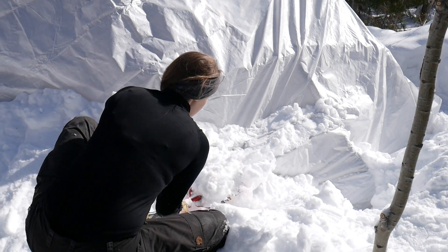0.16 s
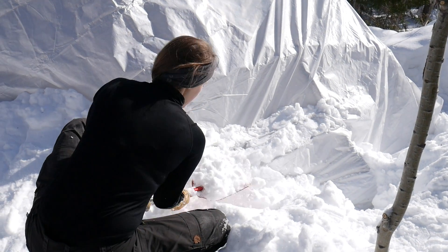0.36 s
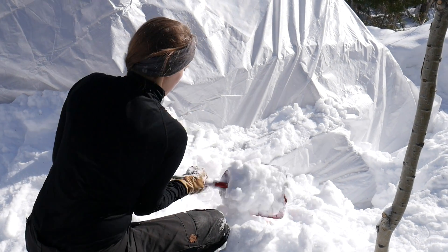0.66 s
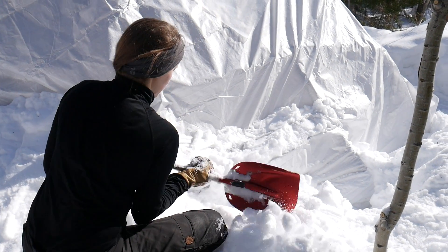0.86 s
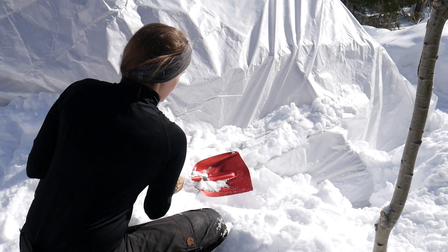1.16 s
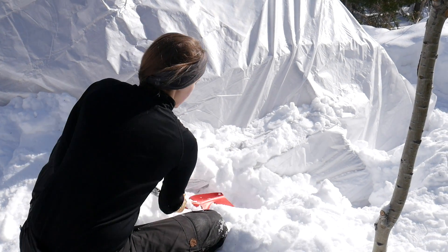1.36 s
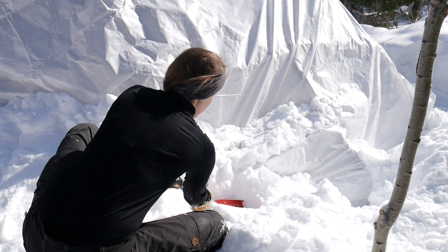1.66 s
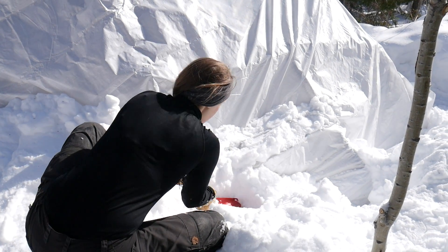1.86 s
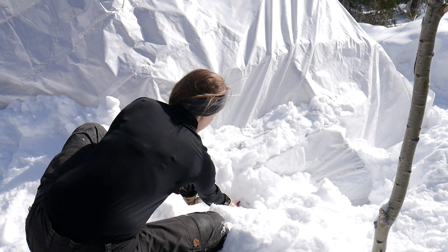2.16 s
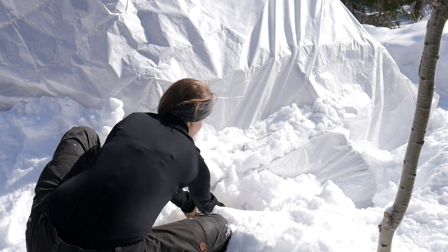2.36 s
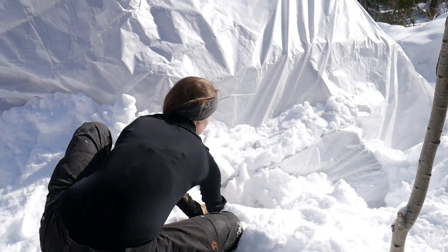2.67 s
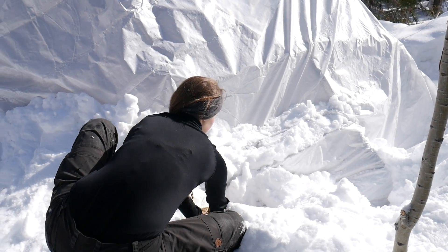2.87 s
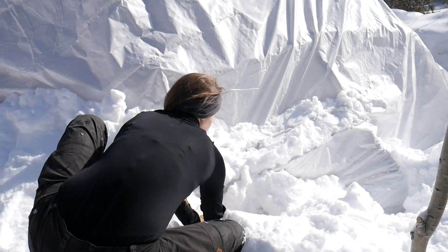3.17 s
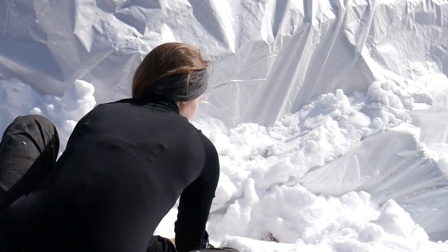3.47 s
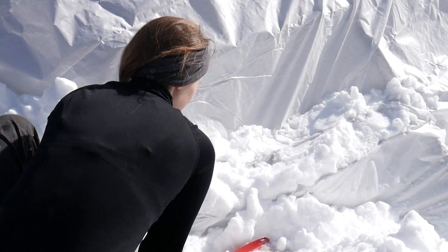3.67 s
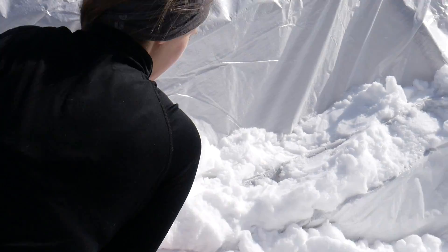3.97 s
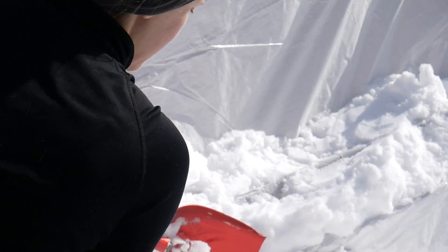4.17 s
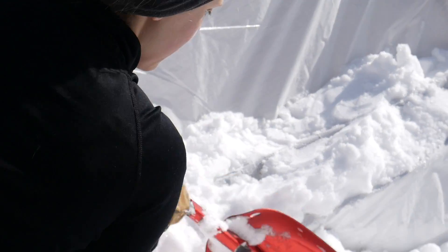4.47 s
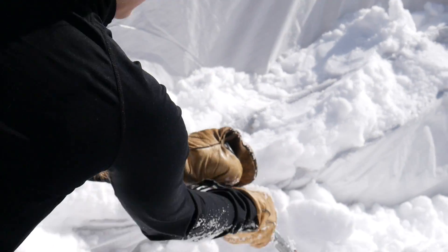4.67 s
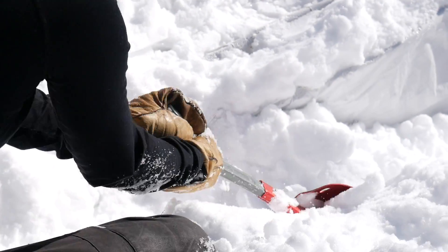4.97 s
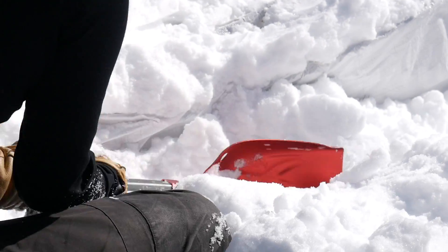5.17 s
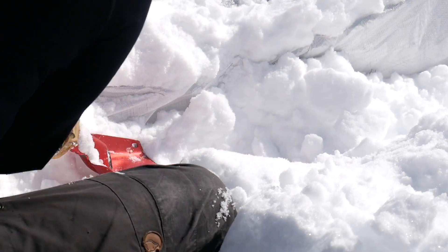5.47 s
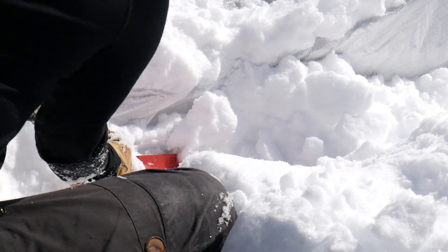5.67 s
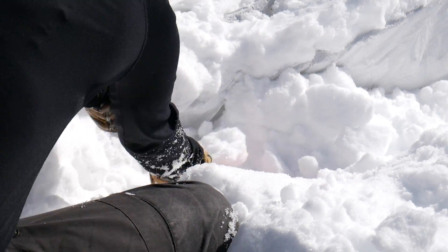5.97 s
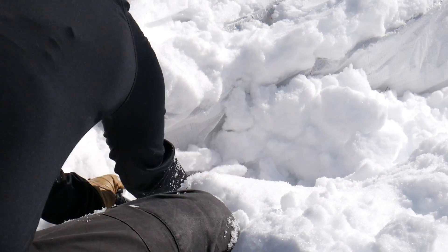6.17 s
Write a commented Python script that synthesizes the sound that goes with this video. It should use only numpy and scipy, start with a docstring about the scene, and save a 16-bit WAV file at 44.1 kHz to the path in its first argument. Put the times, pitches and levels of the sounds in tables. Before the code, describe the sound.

A small shovel scrapes and knocks through packed snow in short uneven strokes, with dull crunches, sliding grains and faint wind.

```python
"""In deep snow, with trees behind, someone kneels and digs with a small shovel a few metres away.
Countless tiny fractures make the blade's scrape and the hiss of sliding snow, and excite the blade's
modes. Hard lumps knock, clods burst, flung crystals tick, and the scraped or struck blade rings briefly
with a gritty tone. Snow packs under load with dull crunches, while the wind swells in the trees."""
import sys
import numpy as np
from scipy import signal
from scipy.fft import rfft, irfft
from scipy.io import wavfile

SR = 44100
rng = np.random.default_rng(int(sys.argv[2]) if len(sys.argv) > 2 else 0)


def bounce(signal):
    """Save signal as a 16-bit WAV file at the path given by the first command-line argument."""
    frames = np.transpose(np.atleast_2d(signal))
    limited = np.clip(frames, -1, 1)
    pcm = np.round(limited * 32767).astype(np.int16)
    wavfile.write(sys.argv[1], SR, pcm)


N = 279153

# Strokes of the blade. Each row: start in seconds, length in seconds, level in dB, swell in dB,
# treble relative to the level in dB, relative level of the packing beneath in dB.
BLADE_STROKES = [(-.005, 0.15, -42, -3.5, -5.5, -37.5), (1.42, 0.0073, -38, 10.5, -4, -59),
                 (1.695, 0.082, -35, 2.5, -4.5, -42), (2.121, 0.12, -34, -16.5, -2.5, -38.5),
                 (3.548, 0.17, -35.5, 13, -12.5, -42.5), (4.589, 0.073, -25, -6.5, -3, -37.5),
                 (5.092, 0.052, -35, 4.5, 4, -37.5), (5.213, 0.168, -31, 0.5, -3.5, -57)]
# Loose snow sliding off the blade or swept by hand. Each row reads as for the strokes.
SNOW_SLIDES = [(0.218, 0.047, -44, 1, -7, -55), (0.348, 0.084, -50, 1, 1.5, -45),
               (0.599, 0.048, -56.5, -16, 2.5, -64), (0.83, 0.24, -46, -9.5, -0.5, -62),
               (1.813, 0.14, -46.5, 6, -8, -46.5), (2.298, 0.094, -35, 2, -9.5, -34),
               (2.482, 0.25, -54.5, -7, -16, -42), (2.899, 0.21, -44.5, 5, -10, -41),
               (3.172, 0.21, -46, -5, -10, -42.5), (3.46, 0.11, -41.5, 11.5, -6, -44),
               (3.774, 0.038, -46.5, -7, -5, -64), (3.918, .18, -40, -1.5, -9, -43),
               (4.135, 0.11, -51.5, -17, -21, -46), (4.666, 0.057, -35, -8, -2.5, -38),
               (4.758, 0.43, -47.5, 21.5, -3.5, -42.5), (5.69, 0.13, -35.5, -7, -2, -37.5),
               (5.868, 0.4, -36, -6, -7.5, -37)]
# Spectrum of shearing grains. Each row: frequency in Hz, gain in dB.
SHEAR_SPECTRUM = [(25, -25), (100, -25), (250, 3), (400, 0), (900, -10), (1300, 6), (1900, 0), (2500, 2),
                  (3400, 1), (5000, 1.5), (7200, -2.5), (10000, -3), (12500, -11), (15500, -24)]


def amp(db):
    """Amplitude grows tenfold with every 20 dB."""
    return 10 ** (np.asarray(db) / 20)


def unit(x):
    """Normalisation to an rms of 1."""
    return x / np.sqrt(np.mean(x ** 2))


def add(out, s, x):
    """Superposition: x joins the mix at s seconds, or at zero if s is negative."""
    start = max(int(s * SR), 0)
    out[start:start + len(x)] += x[:len(out) - start]


def colour(x, points, size=2048):
    """Minimum-phase filtering through (Hz, dB) points: folding the cepstrum makes it causal."""
    hz, db = np.transpose(points)
    log_hz = np.log(np.fft.rfftfreq(size, 1 / SR) + 1)
    cepstrum = irfft(np.log(amp(np.interp(log_hz, np.log(hz), db))))
    cepstrum[1:size // 2] *= 2
    cepstrum[size // 2 + 1:] = 0
    response = irfft(np.exp(rfft(cepstrum)))
    return signal.fftconvolve(x, response)[:len(x)]


def walk(rate, size=N):
    """Slow noise by linear interpolation between random values, rate of them a second."""
    return np.interp(np.arange(size) / SR * rate, np.arange(4096), rng.standard_normal(4096))


def envelope(s, length_s, attack_s, release_db_per_s, swell_db=0):
    """A movement's envelope: a raised-cosine onset, a swell or fade, then exponential decay."""
    age = np.arange(N) / SR - s
    progress = np.clip(age / length_s, 0, 1) - .5
    attack = .5 + .5 * np.sin(np.pi * np.clip(age / attack_s, -.5, .5))
    return attack * amp(swell_db * progress - release_db_per_s * np.maximum(age - length_s, 0))


def puff(t, length_s):
    """A gamma envelope: it builds smoothly, peaks at half of length_s and trails off."""
    age = 2 * t / length_s
    return age ** 2 * np.exp(2 * (1 - age))


def grains(rate, spread_db, size=N):
    """Fracture as a Poisson process of rate impulses a second: most are small, a few are large."""
    happens = rng.random(size) < rate / SR
    strength = amp(spread_db * np.minimum(rng.exponential(size=size), 5))
    return unit(happens * strength * rng.choice([-1, 1], size))


def ring(x):
    """Modal resonance: the snow load detunes the blade's modes, the contact point sets their shares."""
    # Modes of the blade. Each row: frequency in Hz, relative level in dB, time to fall 60 dB in seconds.
    blade_modes = [(1100, 5, 0.021), (1210, -6, 0.016), (1490, 5.5, 0.013), (1600, 2, 0.056),
                   (2060, 5, 0.014), (2450, 8, 0.016), (2543, 13.5, 0.01), (2830, 3, 0.057),
                   (3310, 0, 0.032), (3810, 2, 0.013), (4116, 9, 0.016), (5240, -13, 0.046),
                   (5800, 1, 0.05), (6940, 12, 0.019), (7460, 0, 0.011), (8800, 11, 0.017),
                   (10130, 10, 0.018)]
    t = np.arange(SR // 16) / SR
    hz, db, t60 = np.transpose(blade_modes)[:, :, None]
    detune, share, sign = rng.uniform(-1.1, 1, (3, len(blade_modes), 1))
    modes = np.sign(sign) * amp(db + 4 * share) * np.sin(2 * np.pi * hz * (1 + .012 * detune) * t)
    response = np.sum(modes * np.exp(-np.log(1000) * t / t60), axis=0)
    return signal.fftconvolve(x, response / np.sqrt(np.sum(response ** 2)))[:len(x)]


def pit_echoes(x, echo_db=-9, spread_s=.005):
    """Early reflections from the walls of the pit, whose paths change as the blade moves."""
    t, out = np.arange(len(x)) / SR, x
    for lag in rng.random(4):
        path_s = .001 + spread_s * lag + .0002 * walk(9, size=len(x))
        out = out + amp(echo_db) * np.interp(t - path_s, t, x, left=0)
    return out


def movement(row, spectrum, attack_s, release_db_per_s, ring_db, jerk_db, clump_db, spread_db):
    """Granular friction: in one movement, grains break in jerks and clumps and set the blade ringing."""
    s, length_s, db, swell_db, treble_db, _ = row
    split_hz, lead_s = 5500, .2
    uneven = amp(jerk_db * walk(165.4, size=SR) + clump_db * walk(47.3, size=SR))
    crackle = colour(grains(rate=8000, spread_db=spread_db, size=SR) * uneven, spectrum)
    rasp = pit_echoes(unit(crackle) + amp(ring_db) * unit(ring(crackle)))
    body = signal.sosfiltfilt(signal.butter(3, split_hz, fs=SR, output="sos"), rasp)
    treble = rasp - body  # the fine, dry grains
    out = np.zeros(N)
    add(out, s - lead_s, unit(body) + amp(treble_db) * unit(treble))
    return amp(db) * envelope(s, length_s, attack_s, release_db_per_s, swell_db) * out


def scrapes():
    """Shear fracture: the blade bites through packed grains, rings with them and stops dead."""
    return sum(movement(row, SHEAR_SPECTRUM, attack_s=.04, release_db_per_s=586,
                        ring_db=-4.5, jerk_db=.1, clump_db=1, spread_db=3) for row in BLADE_STROKES)


def packing(crunch_db=-2, creep_db=-51, thud_db=-3, crumble_db=-8, rise_cycles=.72):
    """Compaction: loaded snow gives way in many small dull steps and a few crumbling collapses."""
    # Spectrum of compacting snow. Each row: frequency in Hz, gain in dB.
    dull_spectrum = [(25, -57), (50, -32), (85, -12.5), (150, -2), (330, 4), (440, 1.5), (600, -12.5),
                     (1000, -5.5), (3000, -37)]
    # Collapsing pockets. Each row: start in seconds, relative level in dB, pitch in Hz.
    collapses = [(0.017, -22.5, 223), (0.077, -25, 224), (0.272, -38, 150), (0.367, -36, 338),
                 (0.432, -38, 219), (0.524, -29.5, 193), (1.746, -20, 354), (1.756, -33, 223),
                 (1.926, -25, 302), (2.152, -22.5, 263), (2.258, -26, 335), (2.321, -26, 305),
                 (2.387, -29.5, 131), (2.919, -33, 188), (2.972, -32, 174), (3.167, -29, 340),
                 (3.355, -37, 257), (3.467, -29.5, 250), (3.697, -25.5, 202), (3.704, -21, 480),
                 (3.723, -20.5, 315), (3.725, -27, 500), (4.654, -27, 345), (4.763, -26.5, 325),
                 (4.794, -26, 394), (4.822, -31, 368), (5.077, -24.5, 388), (5.151, -21.5, 397),
                 (5.228, -29, 370), (5.33, -26.5, 400), (5.481, -34, 111), (5.746, -27, 298),
                 (5.902, -31, 264), (5.925, -34, 116), (6.023, -33, 127), (6.168, -21.5, 210)]
    loads = (amp(pack_db) * envelope(s, length_s, attack_s=.031, release_db_per_s=179)
             for s, length_s, *_, pack_db in BLADE_STROKES + SNOW_SLIDES)
    power = amp(creep_db) ** 2 + sum(load ** 2 for load in loads)  # snow also creeps under the knees
    out = amp(crunch_db) * np.sqrt(power) * unit(colour(grains(rate=900, spread_db=2.5), dull_spectrum))
    t = np.arange(SR // 10) / SR
    for s, db, hz in collapses:
        age = hz * t / rise_cycles  # larger pockets sound deeper and last longer
        crumbs = amp(crumble_db) * unit(colour(rng.standard_normal(len(t)), dull_spectrum))
        thud = (np.sin(2 * np.pi * hz * t) + crumbs) * age * np.exp(1 - age)
        add(out, s, amp(db + thud_db) * thud)
    return out


def wind(gain_db=2, breeze_db=-51, flutter_db=1, air_db=-55):
    """Flow noise: a hollow rush in the trees swells with each gust above a steady bed of air."""
    # Spectra of the trees and of the still air. Each row: frequency in Hz, gain in dB.
    tree_spectrum = [(25, -60), (100, -28), (300, -11), (500, -5), (620, 0), (710, 3), (780, 4), (860, 0.5),
                     (1000, -11), (1800, -22), (5000, -30.5), (15000, -55)]
    air_spectrum = [(20, -5.5), (150, 7), (600, 5.5), (2000, -6.5), (9000, -9), (15500, -20)]
    # Gusts. Each row: time of the peak in seconds, relative level in dB, half width in seconds.
    gusts = [(1.74, -40, 0.44), (2.85, -43.5, 0.29), (3.75, -51, 0.29)]
    t = np.arange(N) / SR
    strength = amp(breeze_db) + sum(amp(db) * np.exp(-((t - s) / width_s) ** 2)
                                    for s, db, width_s in gusts)
    rush = unit(colour(rng.standard_normal(N), tree_spectrum)) * strength
    rush *= amp(gain_db + flutter_db * walk(18))
    return rush + amp(air_db) * unit(colour(rng.standard_normal(N), air_spectrum))


def bandpass(x, top_hz, bottom_hz=720):
    """Radiation and contact limit the band: a small blade gives little bass, a soft hit little treble."""
    for hz, kind in ((bottom_hz, "high"), (top_hz, "low")):
        x = signal.sosfilt(signal.butter(2, hz, kind, fs=SR, output="sos"), x)
    return x


def knocks(gain_db=1, crack_db=3, crumble_db=-17, crumble_s=.018):
    """Impact: a lump cracks on the blade, and the harder it is, the shorter the burst; crumbs follow."""
    # Hard lumps. Each row: start in seconds, relative peak in dB, treble cut-off in Hz,
    # breaking time in seconds.
    lumps = [(0.008, -28.5, 2000, 0.011), (0.043, -30, 1800, 0.0025), (.106, -24.5, 2800, 0.0022),
             (0.226, -39, 2600, 0.0011), (0.436, -32.5, 3640, 0.003), (0.991, -35, 4000, 0.0015),
             (1.001, -30.5, 3390, 0.0024), (1.225, -42, 3570, 0.0008), (1.6546, -23.5, 6000, 0.0008),
             (1.729, -20, 3200, 0.0013), (1.743, -21.5, 2950, 0.0041), (1.756, -20, 3150, 0.0022),
             (2.132, -13, 5960, 0.0012), (2.152, -21, 4500, 0.0014), (2.182, -13, 2010, 0.0028),
             (2.207, -13, 3000, 0.001), (2.254, -24, 1970, 0.00059), (2.572, -32.5, 4000, 0.0011),
             (2.711, -35, 4500, .001), (2.821, -34, 4000, 0.00093), (2.86, -33.5, 3500, 0.001),
             (3.7, -19, 2200, 0.0014), (3.7245, -14, 6600, 0.002), (4.063, -11, 2720, 0.0012),
             (4.186, -36.5, 7000, 0.00093), (4.197, -26.5, 2200, 0.001), (4.2267, -32.5, 2400, 0.0023),
             (4.278, -43, 6000, 0.0026), (4.362, -31, 5960, 0.0041), (4.599, -10, 3980, 0.0028),
             (4.6046, -7, 2670, 0.0018), (5.227, -20, 3500, 0.0022), (5.242, -26, 3020, 0.003),
             (5.325, -16.5, 4850, 0.007), (5.362, -23, 4500, 0.0065), (5.649, -28.5, 4560, 0.0022),
             (5.69, -22.5, 8000, 0.0051), (5.748, -28, 3500, 0.0009), (5.772, -26, 2800, 0.00085),
             (5.815, -21.5, 4000, .0045), (5.834, -23, 3000, 0.0015), (5.947, -21, 3500, 0.0045),
             (6.008, -24, 3000, 0.0015), (6.029, -18, 2090, 0.00053), (6.088, -30, 2000, 0.00073),
             (6.1292, -20.5, 1480, 0.0014)]
    out, t = np.zeros(N), np.arange(SR // 8) / SR
    for s, db, cutoff_hz, break_s in lumps:
        burst = np.sqrt(t / break_s) * np.exp(-t / break_s) + amp(crumble_db) * np.exp(-t / crumble_s)
        force = rng.standard_normal(len(t)) * burst
        crack = amp(crack_db) * unit(colour(force, SHEAR_SPECTRUM))
        hit = bandpass(pit_echoes(unit(ring(force)) + crack, echo_db=-19.5), cutoff_hz)
        add(out, s, amp(db + gain_db) * hit / np.abs(hit).max())
    return out


def slides(trickle_db=-64.5, trickle_clump_db=2):
    """Granular flow: tumbling crystals hiss and lightly ring the blade; strays trickle throughout."""
    # Spectrum of loose powder. Each row: frequency in Hz, gain in dB.
    powder_spectrum = [(25, -57), (100, -5), (500, -9.5), (950, -4), (1400, 8), (1950, 1), (2500, 3),
                       (4500, -2.5), (7200, -6.5), (10000, -8.5), (12500, -16), (15500, -30.5)]
    flow = sum(movement(row, powder_spectrum, attack_s=.29, release_db_per_s=160,
                        ring_db=-11, jerk_db=1, clump_db=.5, spread_db=3.5) for row in SNOW_SLIDES)
    strays = grains(rate=6100, spread_db=14) * amp(trickle_clump_db * walk(19))
    return flow + amp(trickle_db) * unit(colour(strays, powder_spectrum))


def clods(gain_db=1, ring_db=-8):
    """Fragmentation: each clod bursts on the blade into a brief scatter of grains."""
    # Bursting clods. Each row: start in seconds, relative level in dB, length in seconds.
    bursts = [(0.356, -43, 0.027), (0.523, -44.5, 0.016), (0.77, -39.5, 0.017), (0.987, -37.5, 0.018),
              (1.231, -42.5, 0.016), (1.277, -42.5, 0.016), (1.651, -30.5, 0.0054), (1.691, -32.5, 0.018),
              (1.794, -33, 0.0064), (1.893, -40, .004), (1.921, -35.5, 0.012), (2.575, -39, 0.0034),
              (3.865, -39, 0.012), (3.918, -39.5, 0.027), (4.019, -36, 0.034), (4.276, -43.5, 0.011),
              (4.314, -46, 0.041), (4.361, -41, 0.022), (4.571, -28.5, 0.029), (4.694, -31.5, 0.0069),
              (4.832, -43.5, 0.056), (5.47, -43, 0.036), (5.592, -43, 0.0081), (5.648, -40.5, 0.024),
              (5.795, -35.5, 0.053)]
    out, t = np.zeros(N), np.arange(SR // 5) / SR
    for s, db, length_s in bursts:
        scatter = colour(grains(rate=12000, spread_db=6, size=len(t)), SHEAR_SPECTRUM)
        burst = pit_echoes(unit(scatter) + amp(ring_db) * unit(ring(scatter)))
        add(out, s, amp(db + gain_db) * puff(t, length_s) * unit(burst))
    return out


def skims():
    """Damped resonance: grains rasp under the half-empty blade, whose hollow ring the snow deadens."""
    # Skimming passes. Each row: start in seconds, length in seconds, level in dB, swell in dB,
    # treble relative to the level in dB, and an unused value.
    passes = [(0.8, 0.13, -41.5, -7, -21, -62), (1.482, 0.034, -43.5, 2.5, -5, -65),
              (1.656, 0.03, -39.5, 3, -8, -55), (1.888, 0.045, -43.5, 10, -8.5, -42),
              (1.951, 0.053, -43.5, -5, -8, -46), (2.093, 0.022, -39, -2, -5.5, -55),
              (2.19, 0.022, -35, -16, -1, -55), (5.233, 0.15, -38.5, 0, -8, -60),
              (5.601, 0.032, -52, -9, -0.5, -65), (5.699, 0.23, -40, 1, -10, -55)]
    # Spectrum of the hollow rasp. Each row: frequency in Hz, gain in dB.
    hollow_spectrum = [(25, -48), (300, -3), (800, -11.5), (1100, 9.5), (1500, 2.5), (1850, -3), (2200, -4),
                       (2490, 14), (2800, -7.5), (3350, 8), (3650, -10), (4050, 3.5), (4800, -3.5),
                       (6450, 3.5), (6900, 5), (7700, -16), (10000, 0), (12500, -20), (15500, -23)]
    return sum(movement(row, hollow_spectrum, attack_s=.04, release_db_per_s=402,
                        ring_db=-9.5, jerk_db=2, clump_db=.5, spread_db=2.5) for row in passes)


def sprays():
    """Shot noise: dry crystals flung off the blade land as tiny, very bright ticks."""
    # Showers of crystals. Each row: start in seconds, level in dB, length in seconds.
    showers = [(0.8, -58, 0.15), (0.973, -54, 0.091), (1.665, -51, 0.09), (1.73, -49, 0.042),
               (2.157, -47, 0.06), (4.575, -47, 0.065), (5.302, -50, 0.06)]
    # Spectrum of the ticks. Each row: frequency in Hz, gain in dB.
    glitter_spectrum = [(25, -60), (6000, -37), (9500, -10), (11500, 1), (13500, 0), (15500, -7)]
    out, t = np.zeros(N), np.arange(SR // 2) / SR
    for s, db, length_s in showers:
        ticks = unit(colour(grains(rate=4000, spread_db=2, size=len(t)), glitter_spectrum))
        add(out, s, amp(db) * puff(t, length_s) * ticks)
    return out


def blade_tones(width_hz=300):
    """Narrow-band resonance: the scraped or struck blade rings briefly with a gritty tone."""
    # Brief rings of the blade. Each row: start in seconds, level in dB, length in seconds, pitch in Hz.
    rings = [(4.597, -24.5, 0.012, 1188), (4.623, -34, 0.028, 2920), (5.351, -33, 0.045, 2510),
             (5.359, -33, 0.03, 1135), (5.644, -38, 0.016, 1070)]
    out, t = np.zeros(N), np.arange(SR // 2) / SR
    for s, db, length_s, hz in rings:
        grit = walk(width_hz, size=len(t)) + 1j * walk(width_hz, size=len(t))
        tone = unit(np.real(grit * np.exp(2j * np.pi * hz * t)))
        add(out, s, amp(db) * puff(t, length_s) * tone)
    return out


def stereo(mid, side):
    """Mid-side stereo: two closely spaced microphones hear nearly alike, each with its own colour."""
    # Stereo width. Each row: frequency in Hz, gain of the side signal in dB.
    width = [(30, -3), (120, -10), (700, -13), (2200, -12.5), (8000, -11.5), (14000, -8)]
    # Channel balance. Each row: frequency in Hz, left minus right in dB.
    balance = [(100, -3.5), (400, -3), (750, -3), (1300, 2.5), (2400, 1), (8000, -0.4)]
    side = colour(side, width)
    return np.array([colour(mid + sign * side, [(hz, sign * db / 2) for hz, db in balance])
                     for sign in (1, -1)])


def scene(wind_side_db=3):
    """Superposition: near grains from slightly different directions, and diffuse wind further off."""
    digging = scrapes() + skims() + slides() + sprays() + knocks() + clods() + blade_tones() + packing()
    direction = unit(np.tanh(2 * walk(260)))
    return stereo(mid=digging + wind(), side=digging * direction + amp(wind_side_db) * wind())


def record(dry, rumble_hz=60, top_hz=15500):
    """Band limiting: the deepest bass rolls off gently and the highest treble is cut steeply."""
    clean = signal.sosfilt(signal.butter(2, rumble_hz, "high", fs=SR, output="sos"), dry)
    return signal.sosfilt(signal.ellip(10, .2, 80, top_hz, fs=SR, output="sos"), clean)


dry = scene()
out = record(dry)
bounce(out)
```